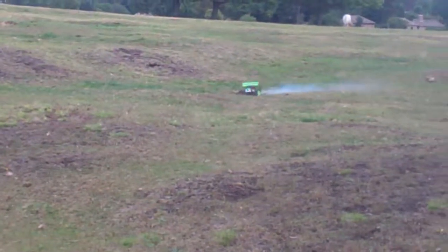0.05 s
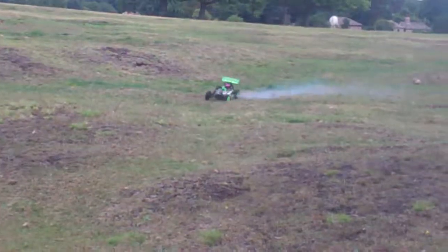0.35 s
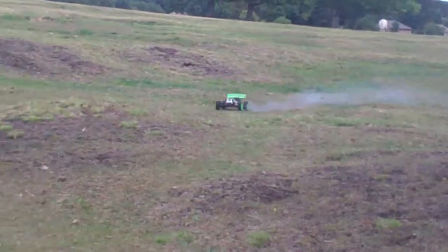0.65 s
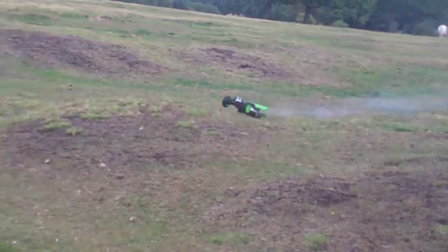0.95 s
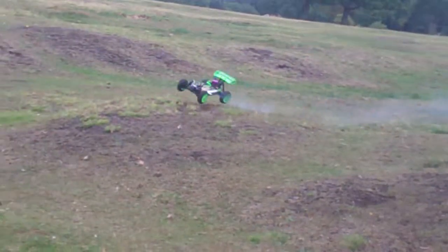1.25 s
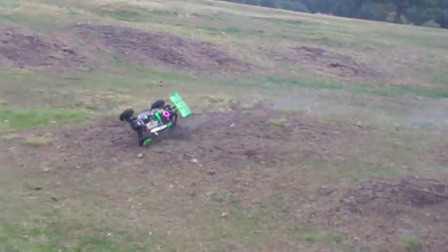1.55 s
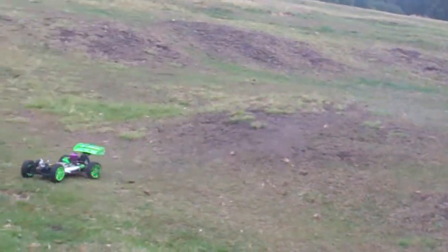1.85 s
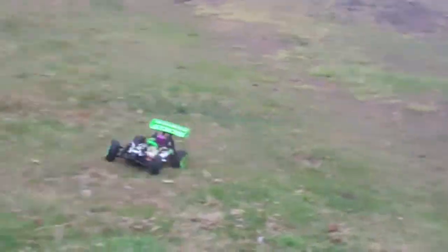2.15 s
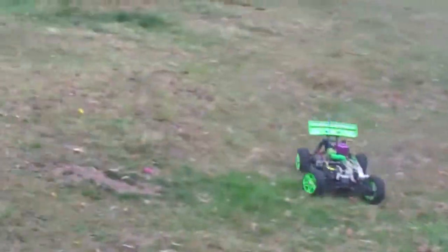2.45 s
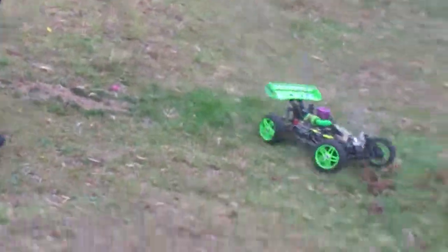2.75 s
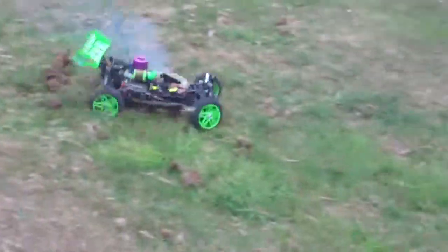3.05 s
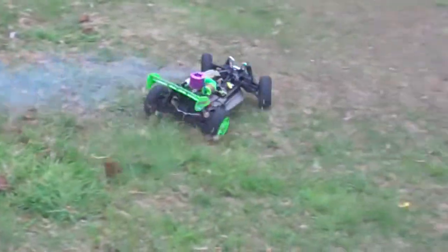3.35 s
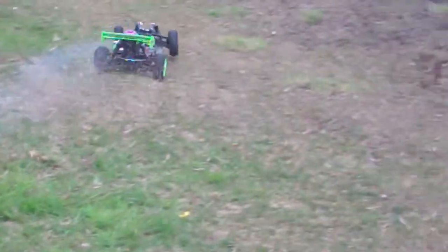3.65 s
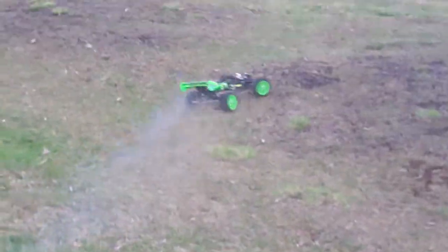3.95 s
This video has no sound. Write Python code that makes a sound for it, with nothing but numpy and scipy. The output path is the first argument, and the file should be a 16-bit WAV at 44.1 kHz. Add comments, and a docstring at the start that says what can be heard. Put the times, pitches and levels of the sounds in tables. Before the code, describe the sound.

High-pitched buzz of a model car engine revving, dropping to idle, then speeding off.

```python
"""A model buggy's tiny two-stroke nitro engine buzzes closer over grass while wind knocks on the
microphone, mostly on the right. Every firing is a pulse through the pipe and a puff of rasping gas;
chassis and turf reflect the buzz. The engine revs up in a jump, then drops to a ragged idle close by.
Near 2.7 s the throttle opens and the buggy pulls away, showing first its flank, then its tailpipe."""
import sys
import numpy as np
from scipy import signal
from scipy.fft import rfft, irfft, next_fast_len
from scipy.io import wavfile
from scipy.ndimage import uniform_filter1d, map_coordinates

SR = 44100
rng = np.random.default_rng(int(sys.argv[2]) if len(sys.argv) > 2 else 0)


def digitize_waveform(pressure):
    """Quantize a signal to 16-bit integers and store it at the path in sys.argv[1].

    Rows of a 2-D input are taken as channels; values are limited to [-1, 1].
    """
    field = np.atleast_2d(pressure).T
    bounded = np.clip(field, -1, 1)
    quanta = np.round(bounded * 32767).astype(np.int16)
    wavfile.write(sys.argv[1], SR, quanta)


N = 176400

IDLE_FROM_S, IDLE_TO_S, CROSSFADE_S = 1.692, 2.74, 0.25  # the throttle closes, then reopens
AWAY_FROM_S, TAIL_FROM_S = 3.006, 3.43  # the flank, then the tailpipe swings toward us


def amp(db):
    """Decibels to gain."""
    return 10 ** (np.asarray(db) / 20)


def unit(x):
    """Scale to rms 1."""
    return x / np.sqrt(np.mean(x ** 2) + 1e-20)


def along(points, hz):
    """Read a curve of (Hz, value) points on a log frequency axis."""
    freqs, values = np.transpose(points)
    return np.interp(np.log(hz + 1), np.log(freqs + 1), values)


def clock():
    """Time of each sample in seconds."""
    return np.arange(N) / SR


def curves(rows):
    """One automation curve for each column after the time."""
    times, *columns = np.transpose(rows)
    return [np.interp(clock(), times, column) for column in columns]


def ramp(at_s, length_s):
    """A fade from 0 to 1 centred on a moment."""
    return np.clip((clock() - at_s) / length_s + .5, 0, 1)


def bell(x, centre, half_width):
    """A bell curve with a peak of 1."""
    return np.exp(-((x - centre) / half_width) ** 2)


def wobble(rate):
    """A smooth random curve, rate knots a second."""
    return map_coordinates(rng.standard_normal(1024), [clock() * rate], mode="wrap")


def filtered(x, response):
    """Filter x by a complex response of frequency."""
    size = next_fast_len(N + SR // 4, real=True)
    return irfft(rfft(x, size) * response(np.fft.rfftfreq(size, 1 / SR)), size)[..., :N]


def resonate(x, colour, size=2048):
    """Ring x through a minimum-phase filter of unit energy with the given colour."""
    cepstrum = irfft(np.log(amp(along(colour, np.fft.rfftfreq(size, 1 / SR)))))
    cepstrum[1:size // 2] *= 2
    cepstrum[size // 2 + 1:] = 0
    impulse = irfft(np.exp(rfft(cepstrum)))
    return signal.oaconvolve(x, impulse / np.linalg.norm(impulse))[:N]


def noise(colour, width, flow=1):
    """Stereo noise of rms 1, modulated by flow, then coloured; width is side over mid, flat or by Hz."""
    mid, side = filtered(flow * rng.standard_normal((2, N)), lambda hz: amp(along(colour, hz)))
    side = filtered(side, lambda hz: along(width, hz)) if np.ndim(width) else width * side
    return unit(np.array([mid + side, mid - side]))


def pulses(times, sizes, order=8):
    """Band-limited clicks placed between samples."""
    at = times[:, None] * SR
    taps = np.floor(at).astype(int) + np.arange(1 - order, order + 1)
    shape = np.sinc(taps - at) * np.cos(np.pi * (taps - at) / (2 * order)) ** 2
    return np.bincount(np.clip(taps, 0, N).ravel(), (sizes[:, None] * shape).ravel(), N + 1)[:N]


def firings(speed, turns, ragged, low_cut_hz=294):
    """One pulse per turn, less even when ragged; little of the pulse train sounds below its low cut."""
    t = clock()
    fired = np.interp(np.arange(int(turns[-1])), turns, t)
    spread = np.interp(fired, t, ragged)
    late, strong = rng.standard_normal((2048, 2))[:len(fired)].T
    jitter_s = late * (5e-6 + 3e-5 * spread)
    sizes = amp(strong * (0.5 + 2 * spread))
    even_power = np.sqrt(SR / np.interp(fired, t, speed))  # the same power at any revs
    train = pulses(fired + jitter_s, sizes * even_power)
    return filtered(train, lambda hz: (1j * hz / (1j * hz + low_cut_hz)) ** 2)


def reflections(x, gain=0.22, sway_s=.00009, rate=7, count=7):
    """Chassis and bumpy ground add weak copies whose paths shift as the buggy rocks."""
    lags_s = [lag + sway_s * wobble(rate) for lag in np.linspace(.0009, .0061, count)]
    copies = sum(map_coordinates(x, [np.arange(N) - lag * SR], order=3) for lag in lags_s)
    return (x + gain * copies) / np.sqrt(1 + count * gain ** 2)


def pipe_buzz(train, front, near, away, tail):
    """The firings ring the exhaust pipe, whose colour depends on the side that faces us."""
    # The pipe head-on, close by, side-on and from behind. Each row: frequency in Hz, gain in dB.
    front_colour = [(800, -26), (1650, 0.5), (2050, -3.5), (2900, 6), (3650, -0.5), (4250, 4.5),
                    (4750, -1.5), (5400, 9.5), (5900, -1.5), (6400, 7), (11000, -13.5)]
    near_colour = [(400, -28.5), (700, 8), (1150, -6), (2200, 10), (2900, 8), (3400, 1.5), (4500, 2),
                   (9000, -15.5)]
    flank_colour = [(1150, -17), (1600, 11), (2000, -3), (2900, 8), (3550, -2.5), (4350, -1), (5000, -2),
                    (5600, -2.5), (10000, -8.5)]
    tail_colour = [(1200, -4), (1700, 3.5), (2200, 5.5), (3050, 8.5), (3400, -3), (3850, 1.5), (4500, -3.5),
                   (6350, 2.5), (10000, -13.5)]
    arriving = resonate(train, front_colour)
    close_by = amp(-2.5) * resonate(train, near_colour)
    leaving = (1 - tail) * resonate(train, flank_colour) + tail * resonate(train, tail_colour)
    return front * arriving + near * close_by + away * leaving


def gas_rasp(puffs, front, thin_below_hz=2600):
    """Gas rushes out in puffs; from the front it is quieter and has little body."""
    # Colour of the rushing gas. Each row: frequency in Hz, gain in dB.
    gas_colour = [(200, -18), (800, -6.5), (2300, 1), (5000, 3), (6200, 1), (7200, 3), (8000, 10.5),
                  (8900, 0.5), (11000, 2)]
    gas = noise(gas_colour, width=[(2500, 0.017), (8000, 0.082)], flow=puffs)
    thin = filtered(gas, lambda hz: hz / np.hypot(hz, thin_below_hz))
    return front * amp(-5.5) * thin + (1 - front) * amp(3) * gas


def firing_fizz(train, puffs, near):
    """The bright edge of each firing: a click and a hiss, with more hiss and less click close by."""
    # Colour of that edge. Each row: frequency in Hz, gain in dB.
    edge_colour = [(5000, -44), (9200, -0.5), (10300, 6.5), (11500, 0), (13300, 6.5), (14050, 9),
                   (14800, -19)]
    clicks = amp(4 - 7.5 * near) * resonate(train, edge_colour)
    hiss = amp(-4.5 + 1.7 * near) * noise(edge_colour, width=0.79, flow=puffs)
    return clicks + hiss


def engine_hum(turns):
    """The two lowest engine orders put a wavering hum under the buzz."""
    # Each row: time in seconds, level of the firing tone in dB, level of its octave in dB.
    order_levels = [(0, -47, -51), (1.5, -41, -42.5), (1.8, -47.5, -52), (2.02, -35, -47.5),
                    (2.64, -34.5, -47.5), (2.76, -46, -37), (3.25, -35.5, -26), (4, -37.5, -30)]
    return sum(np.sqrt(2) * amp(db + 1.54 * wobble(25.15)) * np.sin(2 * np.pi * order * turns)
               for order, db in enumerate(curves(order_levels), start=1))


def patchy(x, depth_db, size=16):
    """The colour shifts in slow random patches."""
    spectrum = signal.stft(x, nperseg=512)[2]
    patches = uniform_filter1d(rng.standard_normal(spectrum.shape[1:]), size // 2, axis=0)
    patches = uniform_filter1d(patches, 2 * size, axis=1)
    return signal.istft(spectrum * amp(depth_db * unit(patches)), nperseg=512)[1][:, :N]


def engine():
    """One pulse and one puff of gas per turn; with the throttle closed the firings grow ragged."""
    # The revs. Each row: time in seconds, firings per second.
    revs = [(0, 337), (.07, 366), (.125, 353), (.185, 390), (.37, 413), (.44, 460), (.555, 460), (.57, 424),
            (.655, 433), (.775, 423), (.845, 480), (.9, 460), (.96, 490), (.98, 438), (1.06, 464),
            (1.11, 466), (1.16, 490), (1.195, 420), (1.265, 433), (1.305, 492), (1.4, 550), (1.59, 537),
            (1.67, 490), (1.7, 400), (1.81, 354), (1.86, 250), (1.98, 226), (2.3, 226), (2.45, 215),
            (2.665, 211), (2.73, 346), (2.845, 292), (2.965, 327), (3.305, 399), (3.425, 410), (3.505, 459),
            (3.55, 420), (3.635, 425), (3.72, 482), (3.777, 484), (3.795, 423), (3.885, 423), (3.905, 443),
            (4, 439)]
    # Fader moves. Each row: time in seconds, then the gains of buzz, rasp and fizz in dB.
    faders = [(0, -24, -23.5, -40), (.17, -29, -20, -42), (.36, -25, -18.5, -39), (.52, -33, -20, -32.5),
              (.74, -32.5, -22, -34), (.83, -30, -15.5, -30), (.93, -31.5, -25, -32.5),
              (1.22, -34, -25, -34.5), (1.34, -24.5, -19, -29), (1.56, -26, -11, -23.5),
              (1.72, -33.5, -23.5, -26), (1.88, -38.5, -31, -32), (2.03, -29, -26, -29.5),
              (2.3, -27, -25, -27), (2.86, -25.5, -26.5, -28), (3.1, -20, -23.5, -29),
              (3.47, -18, -20.5, -24.5), (3.75, -17.5, -24, -22.5), (3.83, -18.5, -24, -29),
              (4.0, -22, -25.5, -31.5)]
    buzz_db, rasp_db, fizz_db = curves(faders)
    speed = curves(revs)[0] * (1 + .004 * wobble(45))  # the revs hunt slightly
    turns = np.cumsum(speed) / SR
    arrived = ramp(IDLE_FROM_S, CROSSFADE_S)
    idle = arrived * (1 - ramp(IDLE_TO_S, CROSSFADE_S))
    away, tail = ramp(AWAY_FROM_S, 0.13), ramp(TAIL_FROM_S, 0.034)
    front, near = 1 - arrived, arrived * (1 - away)
    direct = firings(speed, turns, ragged=idle + 0.29 * tail)  # also ragged speeding off over bumps
    train = reflections(direct)
    puffs = 1 + np.exp(-(turns % 1))  # steady flow plus a puff that fades over each turn
    puffs *= amp((1 + idle) * wobble(130))
    buzz = amp(buzz_db + 1.5) * pipe_buzz(train, front, near, away, tail)
    rasp = amp(rasp_db) * gas_rasp(puffs, front)
    fizz = amp(fizz_db) * firing_fizz(train, puffs, near)
    return engine_hum(turns) + buzz + patchy(rasp + fizz, depth_db=1.93) + ringing_bands(direct)


def wind(left_db=-10, right_db=-0.5):
    """Wind buffets the microphone: a lumpy rumble and a few sharp knocks, stronger on the right."""
    # The gusts. Each row: time in seconds, relative level in dB.
    gusts = [(0, -30.5), (.14, -26), (.21, -46), (.45, -32), (.68, -32.5), (.85, -47.5), (.96, -34.5),
             (1.28, -57.5), (1.5, -32), (1.62, -52.5), (1.96, -31), (2.85, -61)]
    # Single knocks. Each row: peak time in seconds, relative level in dB, half length in seconds.
    knocks = [(.491, -20.5, .0084), (0.72, -21, 0.008), (.924, -17, 0.0081), (1.951, -25.5, .007)]
    # Colours of the rumble and of the knocks. Each row: frequency in Hz, gain in dB.
    rumble_colour = [(20, -34), (50, -11), (190, -4.5), (2500, -44)]
    knock_colour = [(30, -34), (280, -2.5), (520, -5), (3000, -38)]
    rumble_db = curves(gusts)[0] - 5 * ramp(AWAY_FROM_S, CROSSFADE_S) + 6 * wobble(34.91)
    rumble = amp(rumble_db) * noise(rumble_colour, width=0.78)
    bursts = sum(amp(db) * bell(clock(), at_s, half_s) for at_s, db, half_s in knocks)
    return (rumble + bursts * noise(knock_colour, width=0.48)) * amp([[left_db], [right_db]])


def ringing_bands(train):
    """Narrow bands of the buzz ring out briefly."""
    # Each row: peak time and half length in seconds, centre and half width in Hz, level in dB.
    swells = [(0.719, 0.087, 2570, 200, -44), (1.518, .1, 1915, 420, -25), (2.679, .028, 2550, 521, -32),
              (2.771, 0.084, 4713, 330, -30), (3.327, 0.072, 4570, 548.6, -27.5),
              (3.68, 0.072, 5996, 600, -26.5)]
    ringing = np.zeros(N)
    for at_s, half_s, centre_hz, width_hz, db in swells:
        band = unit(filtered(train, lambda hz: bell(hz, centre_hz, width_hz)))
        ringing += band * amp(db) * bell(clock(), at_s, half_s)
    return ringing


def scene():
    """The buggy as the microphone's two ports hear it, and the wind on them."""
    # Phase between the ports. Each row: frequency in Hz, lead of left over right in radians.
    port_phase = [(3000, 0.15), (6550, -0.24), (8350, 0.94), (10500, -0.49)]
    ports = lambda hz: np.exp(1j * along(port_phase, hz) * np.array([[.5], [-.5]]))
    return filtered(engine(), ports) + wind()


def record(dry):
    """A brick-wall low-pass takes off the very top."""
    top_hz = 14250
    return filtered(dry, lambda hz: hz < top_hz)


dry = scene()
out = record(dry)
digitize_waveform(out)
```